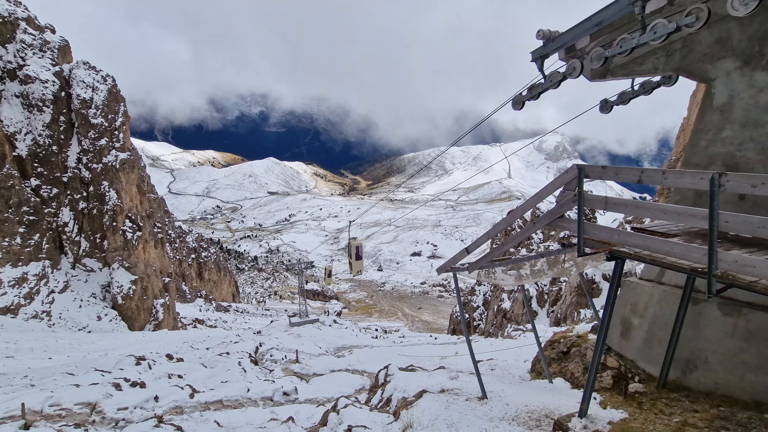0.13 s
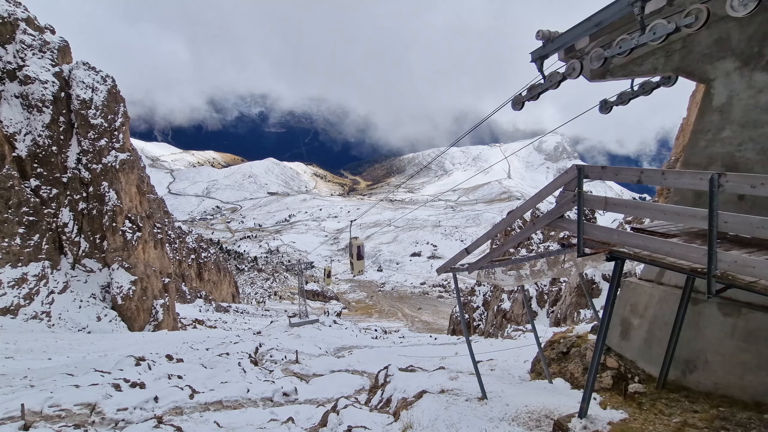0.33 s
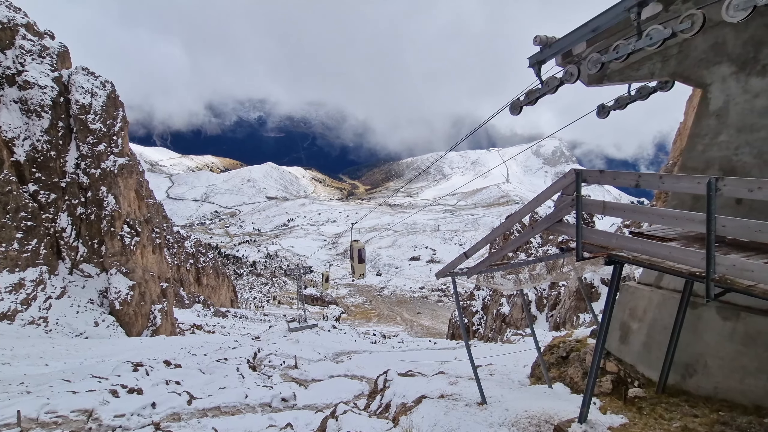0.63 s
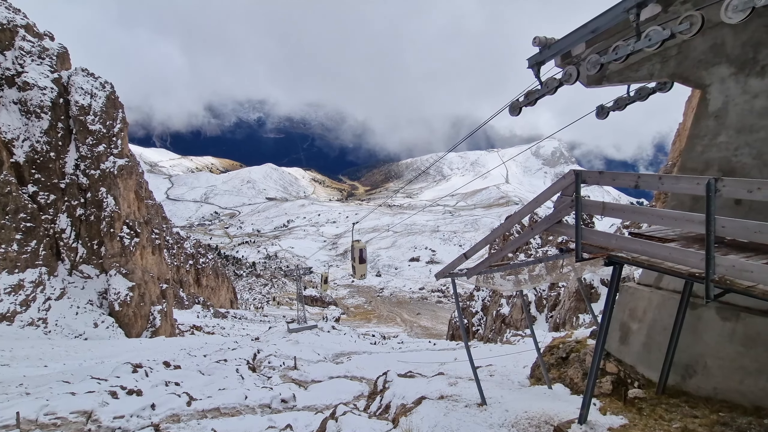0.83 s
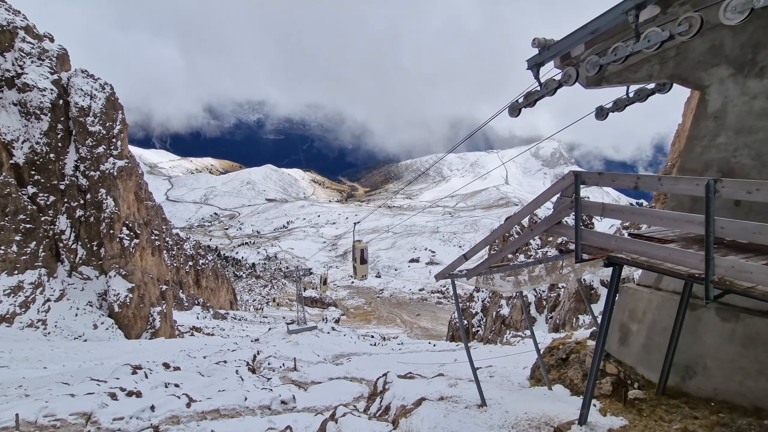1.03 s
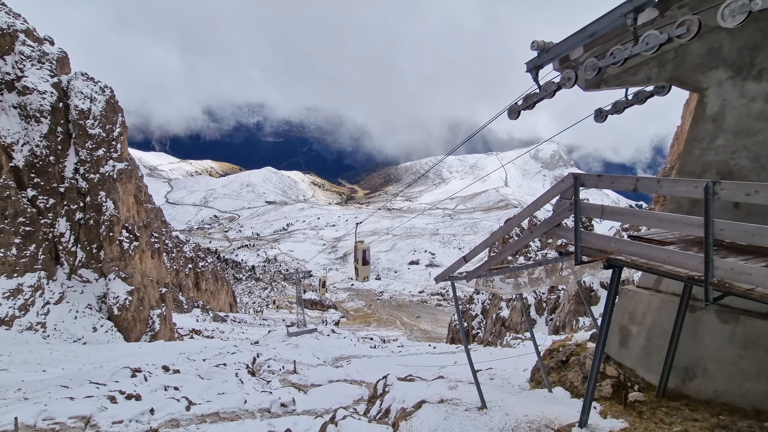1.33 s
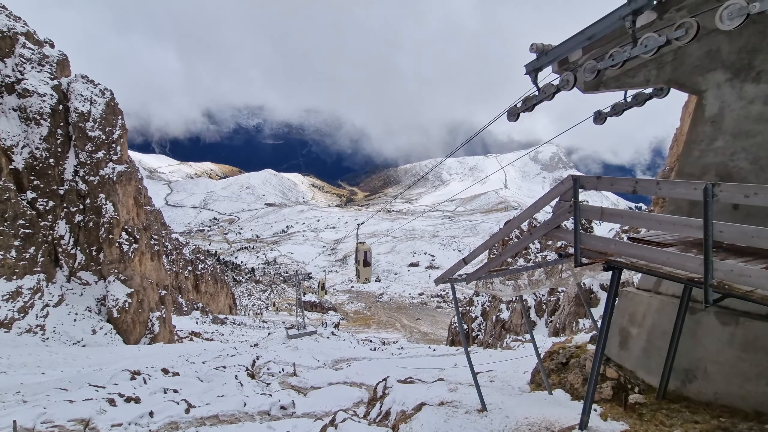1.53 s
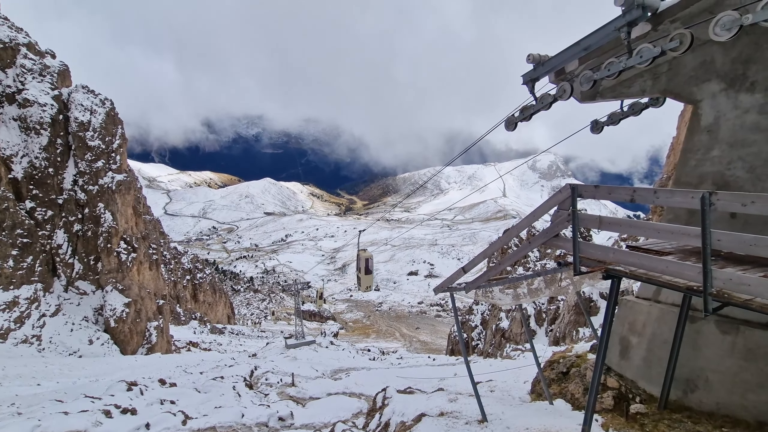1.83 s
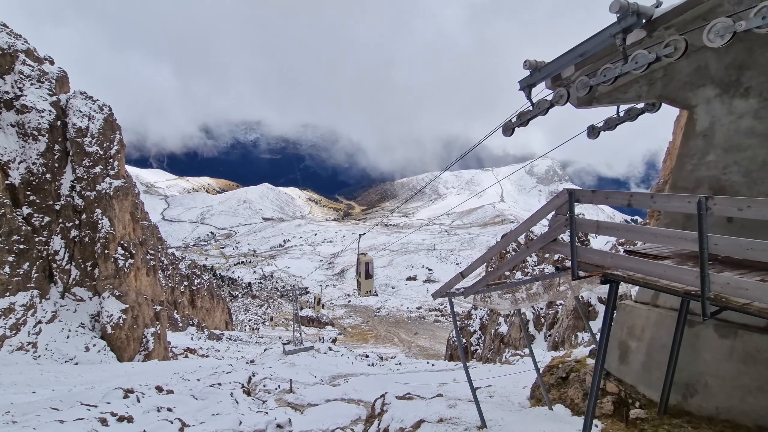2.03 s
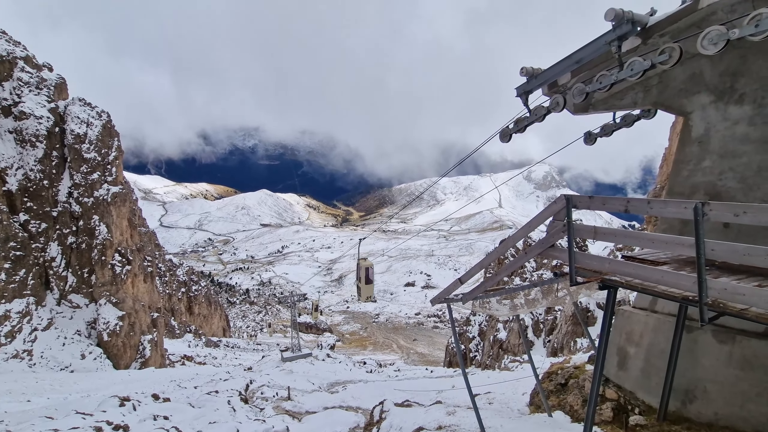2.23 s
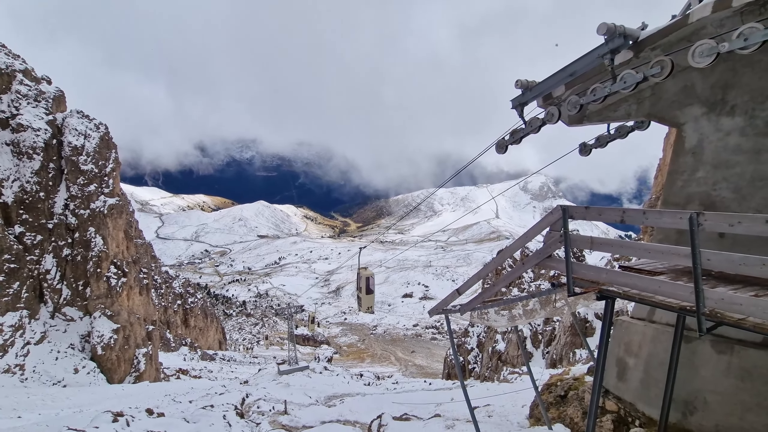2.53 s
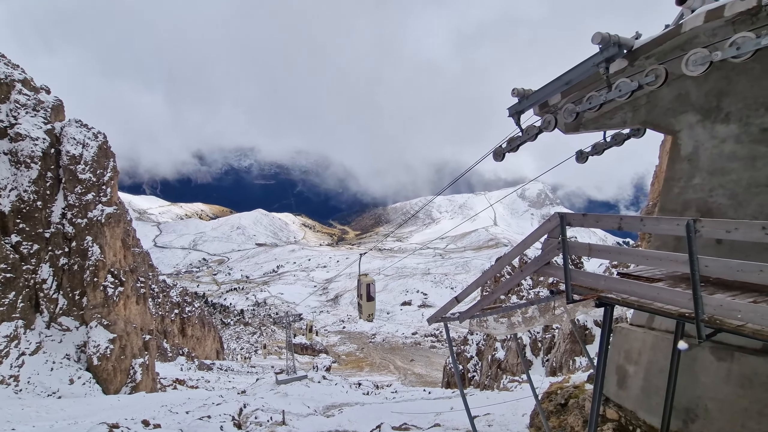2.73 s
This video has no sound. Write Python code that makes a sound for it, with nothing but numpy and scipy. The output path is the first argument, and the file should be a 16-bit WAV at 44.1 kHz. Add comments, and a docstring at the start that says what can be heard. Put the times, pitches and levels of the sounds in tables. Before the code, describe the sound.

After a brief silence, a cable lift starts abruptly and runs on: rope rushing over pulley wheels, fluttering whirr and whine, short groans, low surging hum and soft bumps, outdoors in light wind, close stereo microphone.

```python
"""A cable lift runs at a mountain station, to the right of the microphone, in light wind.
After a short silence all starts abruptly: rope noise, filtered from white noise and rung through resonances,
with a rub that swells about every 0.75 s; gliding tones whirr and whine, throbbing eight times a second.
Mostly between the swells a low frame tone surges, over low-passed noise for the drive and the wind;
from 0.3 s on, short sliding tones groan and soft low tones bump."""
import sys
import numpy as np
from scipy import signal
from scipy.fft import rfft, irfft
from scipy.io import wavfile

SR = 44100
rng = np.random.default_rng(int(sys.argv[2]) if len(sys.argv) > 2 else 0)


def materialize(psi):
    """Save the field psi as 16-bit PCM at rate SR to the path in sys.argv[1].

    A 1-D psi becomes a single channel; in a 2-D psi each row is a channel.
    """
    bounded = np.clip(np.atleast_2d(psi).T, -1, 1)
    quanta = np.round(bounded * 32767).astype(np.int16)
    wavfile.write(sys.argv[1], SR, quanta)


N = 127890
T = np.arange(N) / SR  # seconds
HZ = np.arange(N // 2 + 1) * SR / N + 1e-3  # kept above zero for the logarithm

# Coherence of the sound field at the two microphone ports. Each row: frequency in Hz,
# share of power common to both ports (0 to 1), phase in radians by which the left lags.
PORTS = [(150, .8, 0), (450, .75, .2), (780, .72, .95), (930, .65, 1.7), (1080, .85, 1.5), (1150, .8, 1.75),
         (1260, .78, 2.8), (1850, .6, 3.6), (1960, .7, 6.3), (2150, .65, 6.7), (2400, .35, 7.2),
         (2700, .2, 9.4), (3200, .2, 12), (4900, .25, 11.8), (6000, .3, 15.3), (9000, .35, 15.5),
         (15000, .15, 16.5)]


def undb(db):
    """Decibels to amplitude ratio: 20 dB is a factor of ten."""
    return 10 ** (np.asarray(db) / 20)


def across(table, axis=1):
    """One column of a table at every frequency, interpolated on a logarithmic frequency axis."""
    rows = np.array(table, float)
    return np.interp(np.log(HZ), np.log(rows[:, 0]), rows[:, axis])


def along(table):
    """A (time, value) curve at every sample, by linear interpolation."""
    return np.interp(T, *np.array(table, float).T)


def walk(rate):
    """Band-limited Gaussian noise of unit spread; its spectrum falls to 1/e at rate (Hz)."""
    lowpass = np.exp(-(HZ / rate) ** 2) * (HZ > .1)
    slow = irfft(rfft(rng.standard_normal(N)) * lowpass, N)
    return slow / slow.std()


def swell(at, length):
    """Gaussian envelope: length (s) is its full width at 1/e of the peak."""
    return np.exp(-(2 * (T - at) / length) ** 2)


def turn():
    """Periodic forcing: slightly uneven sheaves press on the rope once a turn, from -1 to 1."""
    turn_hz, high_spot_s = 7.92, 1.19  # rotation rate; one moment when the high spot meets the rope
    return np.cos(2 * np.pi * turn_hz * (T - high_spot_s))


def heard(gain, pan_db):
    """Partial coherence: noise of a given gain per Hz, partly shared and late on the left, partly diffuse."""
    common, left, right = rfft(rng.standard_normal((3, N))) * np.sqrt(SR / 2)
    share = np.clip(across(PORTS, axis=1), 0, 1)
    direct = np.array([common * np.exp(-1j * across(PORTS, axis=2)), common])
    diffuse = np.array([left, right])
    ports = np.sqrt(share) * direct + np.sqrt(1 - share) * diffuse
    pan = undb(np.array([pan_db + 0 * HZ, -pan_db + 0 * HZ]) / 2)
    equal_power = pan / np.sqrt(np.mean(pan ** 2, axis=0))
    return irfft(ports * gain * equal_power, N)


def tone(hz, waver_hz, pan_db, slide=0, rate=16):
    """Frequency modulation: a sine of unit rms whose pitch wanders and slides, phase-lagged on the left."""
    phase = 2 * np.pi * np.cumsum(hz + slide + waver_hz * walk(rate)) / SR
    lag = np.interp(hz, HZ, across(PORTS, axis=2))
    pan = undb(np.array([[pan_db], [-pan_db]]) / 2)
    equal_power = pan / np.sqrt(np.mean(pan ** 2))
    return np.sqrt(2) * np.sin([phase - lag, phase]) * equal_power


def low_noise(spectrum, side_db):
    """Mid-side noise with the treble rolled off; side_db sets how far the two ports differ."""
    dull = 1 / (1 + (HZ / 900) ** 4)
    white = rfft(rng.standard_normal((2, N))) * np.sqrt(SR / 2)
    mid, side = irfft(white * undb(across(spectrum)) * dull, N)
    return mid + undb(side_db) * side * np.array([[1], [-1]])


def ring():
    """Forced resonance: sheave and frame modes kept ringing by the rolling rope."""
    # Each row: frequency in Hz, half-width in Hz at which the response is 6 dB down,
    # level in dB, left minus right in dB.
    modes = [(560, 67, -85, 5), (787, 25, -66.5, 2), (1112, 135, -62.5, 0), (1571, 20, -65, -1),
             (1697, 11, -62.5, -1), (1850, 28, -66, 1), (2070, 144, -59.5, -6), (2844, 35, -59.5, 7),
             (3184, 38, -76, 4), (3994, 22, -66.5, -10), (7430, 44, -69.5, -11)]
    out = 0
    for hz, width, db, pan_db in modes:
        shape = 1 / (1 + 1j * (HZ - hz) / width) ** 2
        unit_power = shape / np.sqrt(np.sum(abs(shape) ** 2) * SR / N)
        out = out + heard(unit_power * undb(db), pan_db)
    return out


def fine_modes(count, depth_db):
    """Modal overlap: the many small modes of the steelwork as a random ripple over frequency."""
    ripple = np.interp(HZ, np.linspace(0, SR / 2, count), rng.standard_normal(count))
    return undb(depth_db * ripple)


def sheaves():
    """Rolling contact: steady roll, rubbing that swells and throbs, and modes, roughened by the strands."""
    # Rope rolling on the sheaves. Each row: frequency in Hz, density in dB per Hz.
    roll_spectrum = [(150, -85.5), (260, -89), (370, -91), (490, -81.5), (680, -82.5), (900, -83.5),
                     (1020, -83.5), (1250, -78.5), (1500, -75), (1800, -74.5), (2250, -82.5), (2550, -83.5),
                     (3200, -83), (4200, -87.5), (5300, -91), (6600, -95), (7600, -93.5), (8500, -93.5),
                     (9300, -104), (10300, -120), (15500, -130)]
    # Rope rubbing in the grooves, before its swells. Each row: frequency in Hz, density in dB per Hz.
    rub_spectrum = [(400, -100), (1500, -82), (2500, -90), (3000, -83), (3900, -82.5), (5000, -89),
                    (6500, -99.5), (8300, -97.5), (10000, -115), (15500, -130)]
    # Strength of the rubbing. Each row: time in seconds, change in dB.
    rub_level = [(.18, -2.5), (.28, -8.5), (.43, 1.5), (.52, -1), (.63, 3), (.72, -2), (.95, -4),
                 (1.08, -6.5), (1.2, 2.5), (1.41, 1), (1.56, -6.5), (1.72, -1), (1.85, -5), (1.96, 1.5),
                 (2.12, 2.5), (2.3, -4), (2.58, -5.5), (2.72, 3), (2.9, -1)]
    # Balance of roll and rub. Each row: frequency in Hz, left minus right in dB.
    balance = [(300, 0.5), (1200, 0), (1700, -2), (2250, -4), (2550, 3.5), (2950, 3.5), (3400, -1),
               (4200, -12), (4800, 5.5), (6000, -2), (8000, 0.5), (15000, -17)]
    pan_db = across(balance)

    roll = heard(undb(across(roll_spectrum)) * fine_modes(count=800, depth_db=1.5), pan_db)
    roll = roll * undb(0.83 * walk(17.5))

    rub = heard(undb(across(rub_spectrum)) * fine_modes(count=450, depth_db=3.0), pan_db)
    rub_flutter_db = 0.53 * walk(7.4)
    rub_grain_db = 1.02 * walk(70)
    rub = rub * undb(along(rub_level) + rub_flutter_db + 1.0 * turn() + rub_grain_db)

    ringing = ring() * undb(2.0 * walk(6.8))
    strand_grain = undb(0.64 * walk(95))
    return (roll + rub + ringing) * strand_grain


def whirr():
    """Narrow-band modulation: the rims sing in close strands that glide and flutter independently."""
    # Strands of the whirr. Each row: pitch in Hz, rms waver in Hz, level in dB, left minus right in dB.
    rims = [(1995, 24.9, -53.5, -13.5), (2076, 27, -54, -12.5), (2209, 48, -58.5, -4)]
    # Level of the whirr. Each row: time in seconds, change in dB.
    rim_level = [(.14, 1.5), (.27, -1), (.46, 0.5), (.56, -1), (.82, 0), (.91, 6), (1.06, -3), (1.26, -1.5),
                 (1.36, 4), (1.53, -1.5), (1.69, 4), (1.8, -2.5), (1.97, 0.5), (2.17, 4), (2.3, -2),
                 (2.42, 2), (2.56, -1), (2.72, 3), (2.9, 0.5)]
    glide_hz, flutter_hz, flutter_db = 30, 32, 6  # bandwidths of pitch and level motion; limit of flutter
    strands = 0
    for hz, waver, db, pan in rims:
        level_db = db + flutter_db * np.tanh(walk(flutter_hz))
        strands = strands + tone(hz, waver, pan, rate=glide_hz) * undb(level_db)
    shudder_db = 1.2 * walk(22)
    return strands * undb(along(rim_level) + shudder_db + 0.4 * turn())


def sizzle():
    """Amplitude-modulated noise: faint top hiss that flutters as the rope strands pass."""
    # Each row: frequency in Hz, density in dB per Hz.
    hiss = [(4000, -120), (8000, -111), (11700, -110.5), (13000, -113.5), (15500, -116)]
    flutter_db = 1.1 * walk(16) + 1.2 * turn() + 1.5 * walk(150)
    return heard(undb(across(hiss)), 0) * undb(flutter_db)


def whines():
    """Frequency and amplitude modulation: wheels whine on wavering notes, strongest once a turn."""
    # Each row: pitch in Hz, rms waver in Hz, level in dB, left minus right in dB.
    notes = [(777.5, 16.06, -63.5, 5.5), (1098, 34, -60.5, 6), (1860, 17.9, -54.5, 0.5)]
    out = 0
    for hz, waver, db, pan in notes:
        flutter_db = 3 * np.tanh(walk(22))
        fade_db = 3 * np.tanh(walk(6.7))
        out = out + tone(hz, waver, pan) * undb(db + flutter_db + fade_db)
    return out * undb(2.0 * turn())


def hum():
    """Amplitude envelopes on one low mode of the steel frame, surging and sinking back."""
    # Each row: middle in seconds, length in seconds, level in dB added over the resting hum.
    surges = [(0.169, 0.18, -30.5), (0.282, 0.033, -38.5), (0.478, 0.11, -38.5), (0.756, 0.081, -44.5),
              (0.863, 0.22, -32.5), (1.009, 0.061, -36.5), (1.685, 0.13, -30.5), (2.137, 0.069, -40.5),
              (2.258, 0.031, -36.5), (2.354, 0.097, -31.5)]
    hum_hz, wander_hz, rest_db = 79.73, 0.96, -48
    phase = 2 * np.pi * np.cumsum(hum_hz + wander_hz * walk(12.2)) / SR
    size = undb(rest_db) + sum(undb(db) * swell(at, length) for at, length, db in surges)
    return np.sqrt(2) * size * np.sin(phase)


def rumble():
    """Low-passed random vibration: the drive rumbles unevenly under the hum."""
    # Each row: frequency in Hz, density in dB per Hz before the treble roll-off.
    drive = [(30, -84), (55, -65), (85, -63), (110, -63.5), (150, -76), (210, -78.5), (300, -89),
             (600, -110)]
    shudder_db = 2.5 * walk(19)
    return low_noise(drive, side_db=-9) * undb(shudder_db)


def wind():
    """Turbulent pressure: light gusts on the microphone as low noise, nearly alike at both ports."""
    # Each row: frequency in Hz, density in dB per Hz before the treble roll-off and the gusts.
    buffet = [(15, -84), (27, -77), (40, -58), (58, -59), (80, -66), (130, -78), (300, -97)]
    # Strength of the wind. Each row: time in seconds, change in dB.
    gusts = [(.12, 1), (.28, -5), (.35, 9), (.43, -24), (.58, -7), (.7, 3), (.9, -14), (1, -3), (1.11, -1),
             (1.21, 5), (1.43, 3), (1.65, 1), (1.9, 0.5), (2.07, -1.5), (2.22, 0), (2.3, 2), (2.78, 6),
             (2.85, -6)]
    return low_noise(buffet, side_db=-16) * undb(along(gusts) + 0.4 * walk(23))


def groans():
    """Frequency glide under a Gaussian envelope: now and then a wheel briefly sings out."""
    # Each row: middle in seconds, length in seconds, pitch at the middle in Hz,
    # slide in Hz per second, peak level in dB.
    cries = [(.305, 0.065, 1090, -600, -51.5), (.442, 0.044, 1090, 999, -48),
             (.575, 0.054, 1120, -600, -50.5), (.668, 0.027, 1095, 502.5, -49.5),
             (.662, 0.043, 425, -1, -55), (.667, 0.026, 340, 1.5, -54.5), (1.09, 0.067, 1115, 701, -49.5),
             (1.205, 0.051, 1085, 798, -50.5), (1.418, .035, 1100, 2, -50), (1.56, 0.029, 1085, 501.5, -50),
             (1.686, 0.053, 480, 0.5, -52.5), (1.802, 0.032, 1053, 0, -50),
             (1.955, .055, 1085, -900, -45.5), (2.163, .04, 1110, 599.5, -48),
             (2.72, 0.052, 1110, -400, -54.5), (2.827, 0.02, 1110, 997.5, -48)]
    out = 0
    for at, length, hz, slide, db in cries:
        note = tone(hz, waver_hz=8, pan_db=0.91, slide=slide * (T - at))
        out = out + note * undb(db) * swell(at, length)
    return out


def bumps():
    """Short tone bursts under a Gaussian envelope: soft low bumps as the load shifts."""
    # Each row: middle in seconds, length in seconds, pitch in Hz, peak level in dB.
    knocks = [(0.354, 0.016, 89.2, -40), (0.583, 0.024, 85, -33), (0.627, 0.049, 151.7, -47),
              (1.115, 0.034, 149.2, -51), (1.285, 0.037, 80.7, -39), (1.412, 0.043, 59.2, -34),
              (1.492, .025, 87, -42), (1.861, .018, 75, -30), (1.927, 0.017, 170, -45),
              (2.497, .04, 194.5, -51), (2.744, .05, 151.1, -44.5), (2.855, 0.017, 120, -41.5)]
    out = 0
    for at, length, hz, db in knocks:
        out = out + tone(hz, waver_hz=9, pan_db=0) * undb(db) * swell(at, length)
    return out


def scene():
    """Superposition: the lift and the wind add together."""
    lift = sheaves() + whirr() + sizzle() + whines() + hum() + rumble() + groans() + bumps()
    return lift + wind()


def record(dry):
    """Gating and low-pass filtering: an abrupt start after a short silence, with the top cut."""
    start_s, top_hz = .117, 15750
    top_cut = signal.ellip(10, .2, 80, top_hz, fs=SR, output="sos")  # 0.2 dB ripple, 80 dB stopband
    return signal.sosfilt(top_cut, dry * (T >= start_s))


dry = scene()
out = record(dry)
materialize(out)
```